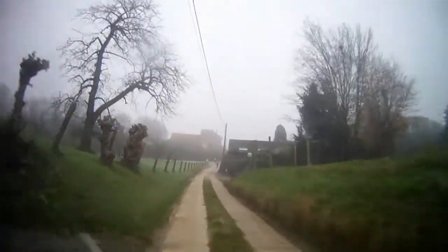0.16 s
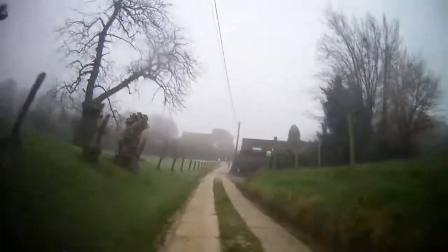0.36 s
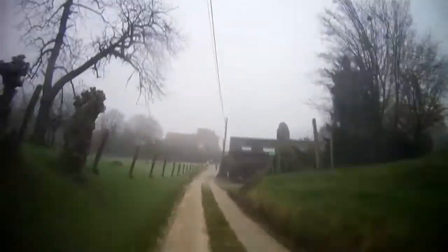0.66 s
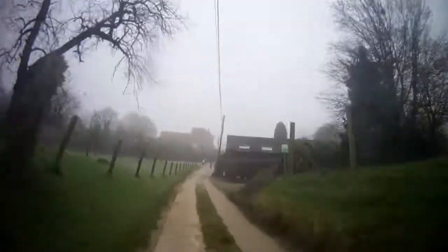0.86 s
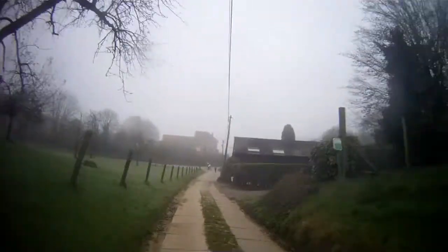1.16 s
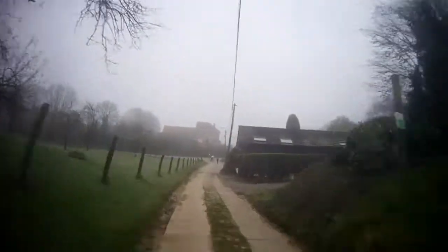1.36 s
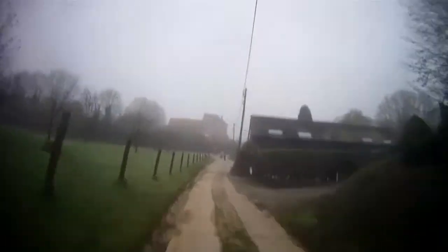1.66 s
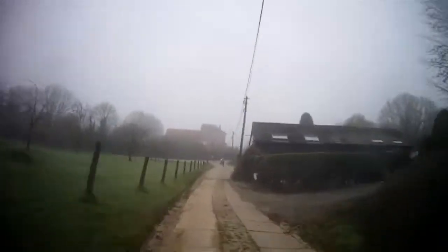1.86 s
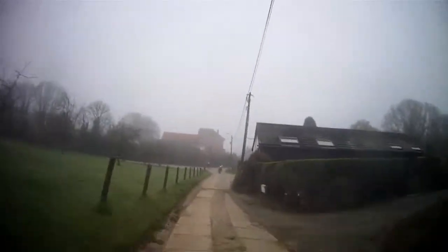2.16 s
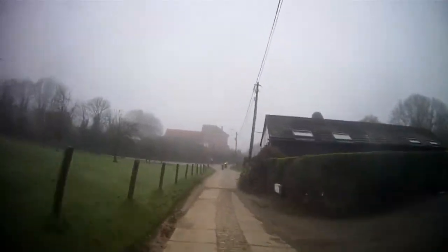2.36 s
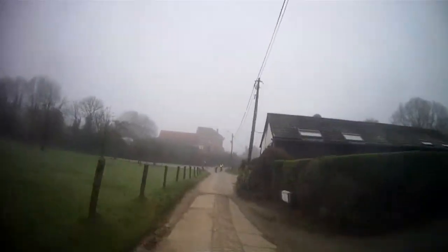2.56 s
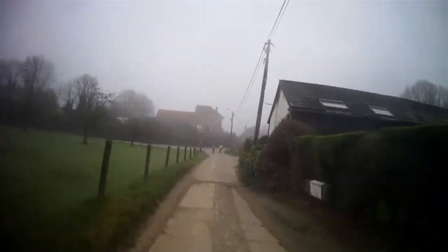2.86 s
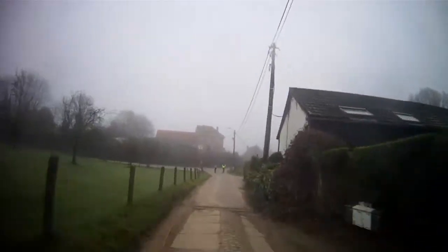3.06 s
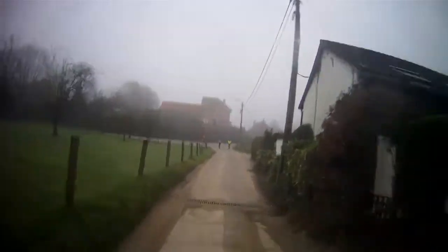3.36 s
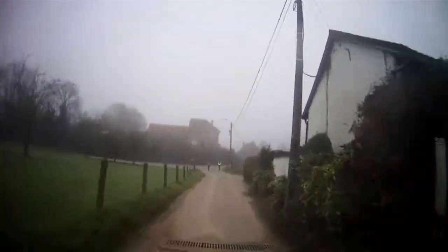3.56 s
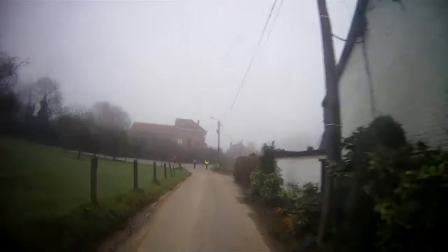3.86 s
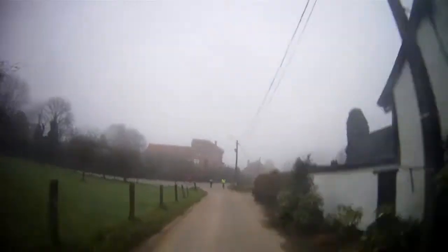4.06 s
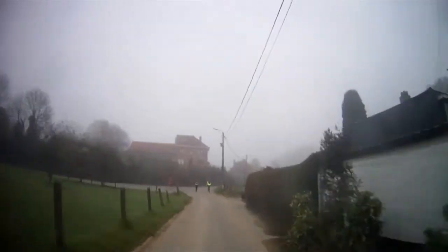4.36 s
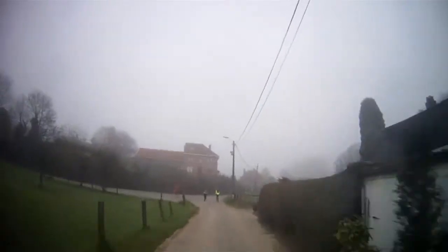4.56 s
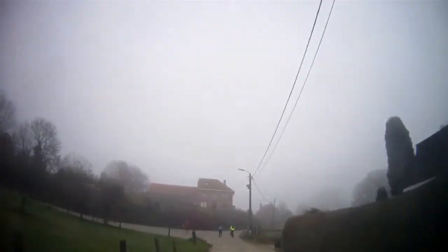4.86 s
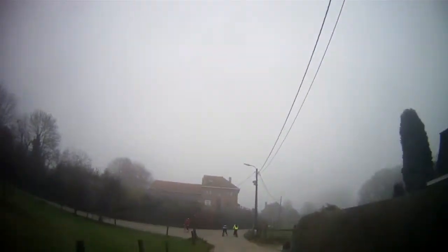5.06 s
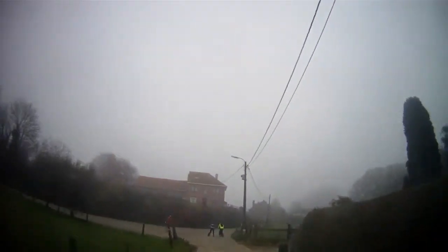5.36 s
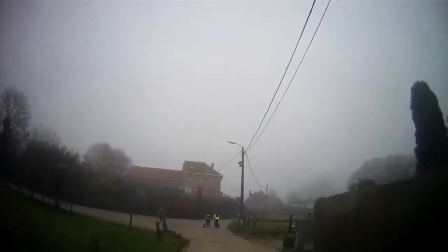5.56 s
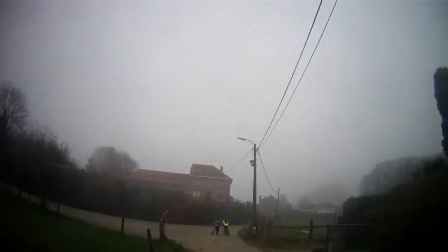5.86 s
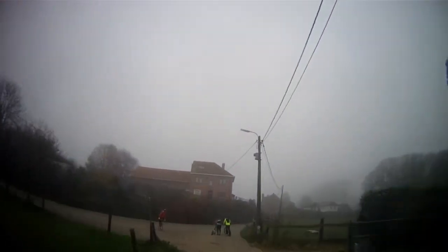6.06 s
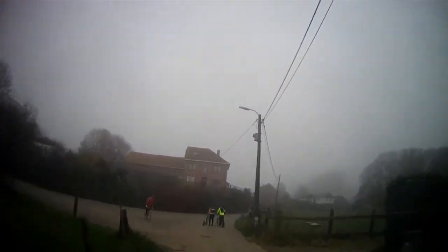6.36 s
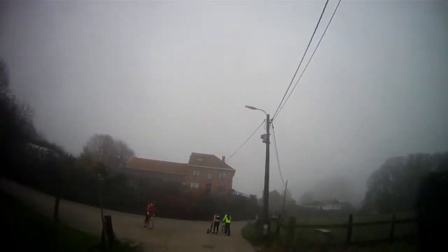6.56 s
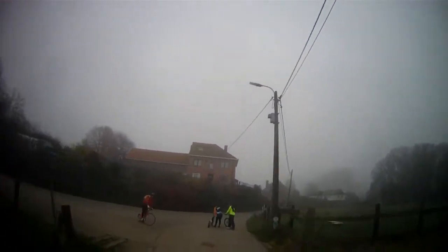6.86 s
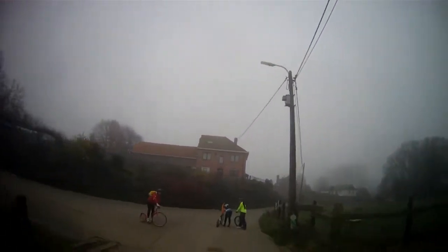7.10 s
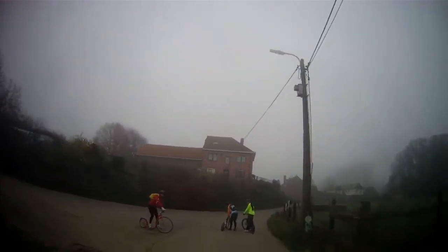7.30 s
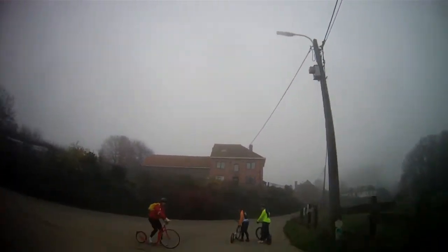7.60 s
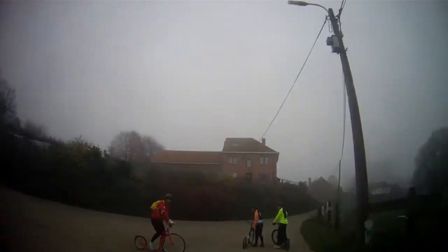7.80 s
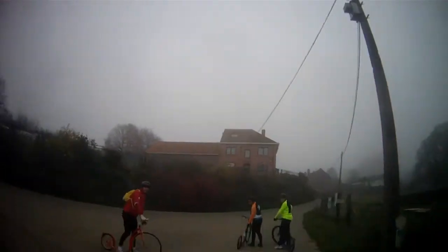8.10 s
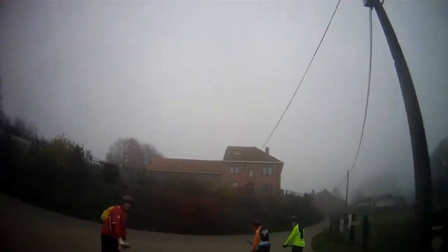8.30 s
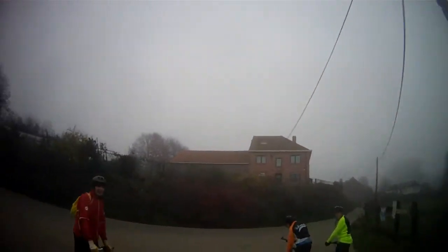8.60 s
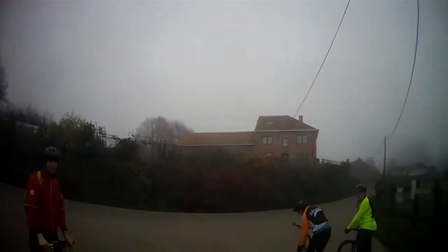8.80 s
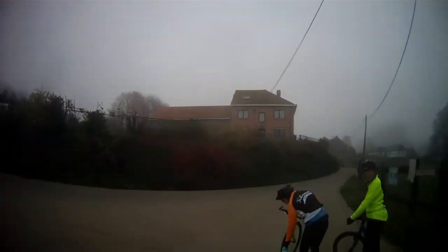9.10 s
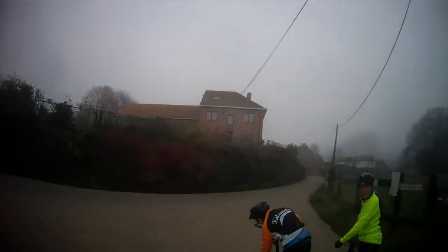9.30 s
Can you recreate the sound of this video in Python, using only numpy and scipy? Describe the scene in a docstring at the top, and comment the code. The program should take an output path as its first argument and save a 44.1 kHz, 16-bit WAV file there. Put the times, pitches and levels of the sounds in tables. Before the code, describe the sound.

A kick scooter rolls over rough concrete with a steady gritty rush, then slows through loose rattling ticks and stops into faint hiss.

```python
"""Kick scooter braking to a halt

A kick scooter rolls over concrete, then smoother asphalt, and brakes to a halt, heard by one microphone
in a closed camera case. Tyre rumble, roar and sizzle are shaped noise; road grit excites fixed resonances
of frame, stem, case and mount. Loose parts tick as short damped modes and chatter as resonant grit at low speed.
The brake pads rub as patchy resonant noise and whistle briefly as a wavering sine, over microphone hiss."""
import sys
import numpy as np
from scipy import signal
from scipy.fft import rfft, irfft, next_fast_len
from scipy.io import wavfile
from scipy.ndimage import uniform_filter1d, map_coordinates

SR = 44100
rng = np.random.default_rng(int(sys.argv[2]) if len(sys.argv) > 2 else 0)


def put_to_file(sound):
    """Save the sound as 16-bit audio at rate SR, in the file named by the first command-line argument."""
    columns = np.atleast_2d(sound).T  # one column per channel
    safe = np.clip(columns, -1, 1)
    whole_steps = np.round(safe * 32767)
    wavfile.write(sys.argv[1], SR, whole_steps.astype(np.int16))


N = 416298

# Rolling levels before jolts and wavering. Each row: time in seconds, tyre roar in dB,
# shaking of the case in dB, hum of the frame in dB, tyre sizzle in dB.
ROLL_LEVELS = [(0.0, -53, -50.5, -51, -55), (0.39, -53, -49.5, -50, -62), (0.84, -55, -53, -50.5, -59),
               (1.3, -53.5, -51, -50, -57), (1.46, -53.5, -51, -46, -53.5), (1.66, -52, -50, -46.5, -59),
               (1.84, -54.5, -49.5, -51.5, -58), (1.99, -52, -49.5, -50, -57),
               (2.09, -53.5, -50.5, -48.5, -55), (2.28, -54, -49, -50, -54), (2.71, -53, -49.5, -50.5, -63),
               (2.95, -52, -47.5, -50, -56), (3.23, -53.5, -48.5, -48.5, -57),
               (3.63, -52.5, -50, -51.5, -53.5), (3.79, -53, -49, -50.5, -55.5),
               (3.94, -52, -51.5, -53, -67), (4.07, -54, -48.5, -50, -53.5), (4.26, -54, -49.5, -50, -52),
               (4.63, -55.5, -54, -53, -57), (5.0, -54.5, -54, -52, -51), (5.28, -54.5, -53.5, -53, -53),
               (5.6, -55, -54, -54, -56), (5.78, -55.5, -57, -55.5, -54), (5.9, -53, -54, -52, -53),
               (6.1, -55.5, -57, -53, -57), (6.44, -57, -61, -58, -62), (6.6, -58.5, -62, -58.5, -61.5),
               (7.0, -63, -66.5, -63, -71.5), (7.38, -60.5, -65, -61.5, -68),
               (7.48, -63.5, -69, -64.5, -78), (7.7, -62, -65, -62, -72), (7.86, -61, -69.5, -65, -70),
               (7.95, -59, -67.5, -61.5, -69), (8.17, -64.5, -71.5, -65, -77), (8.49, -68.5, -75, -73, -88),
               (8.73, -68.5, -76, -67, -88), (8.86, -72, -75, -72, -90), (8.97, -77.5, -77, -77, -92),
               (9.1, -89, -82, -75, -91), (9.44, -99, -80, -79, -83)]
# Stretches of road. Each row: start in seconds, rumble over roar in dB, stem over case in dB,
# mount over case in dB, damped share of the case (0-1).
ROAD_STRETCHES = [(0, -13.5, -6, -6.5, 0.1), (2.25, -11, -5.5, -10.5, 0.1), (3.0, -11, -4.5, -8.5, 0.1),
                  (3.55, -12.5, -5, -18, 0.4), (4.35, -8.5, -0.5, -8, 0), (4.7, -16, -5.5, -10, 0.5),
                  (5.5, -17.5, -4.5, -15, 0.6), (6.4, -11.5, -3, -9.5, 0.4), (7.6, -14, -2.5, -7, .6),
                  (8.2, -9.5, -4, -4, 0.5)]


def rolling():
    """Shared bumps shake every layer but the rumble; frame and case ring to the same road grit."""
    roar_db, case_db, frame_db, sizzle_db = curves(ROLL_LEVELS)
    rumble_over_db, stem_over_db, mount_over_db, damped = stretches(ROAD_STRETCHES)
    jolt_low_db, jolt_high_db = jolts()
    bumps_db = 0.37 * wobble(14) + 0.5 * wobble(35)
    road = grit(rate_hz=1200, spread_db=5.5, share=0.31)
    jolted_case_db = case_db + jolt_high_db
    layers = [
        rumble(roar_db + rumble_over_db),
        roar(roar_db, bumps_db),
        sizzle(sizzle_db + jolt_high_db, bumps_db),
        frame(frame_db + jolt_low_db, bumps_db, road),
        stem(case_db + stem_over_db, bumps_db),  # no jolts
        case(jolted_case_db, bumps_db, road, damped),
        mount(jolted_case_db + mount_over_db, bumps_db),
    ]
    return sum(layers)


# Tyre roar spectrum. Each row: frequency in Hz, relative density in dB per Hz.
ROAR_SPECTRUM = [(150, -23), (300, -15.5), (500, -5), (750, -0.5), (1100, -6), (1400, -9.5), (2300, -36),
                 (3500, -20.5), (6000, -55), (8000, -60)]


def roar(level_db, bumps_db):
    """Tyre roar: noise in a broad midrange band."""
    waver_db = 0.84 * bumps_db + 0.28 * wobble(6.4)
    return amp(level_db + waver_db) * coloured(rng.standard_normal(N), ROAR_SPECTRUM)


# Low rumble spectrum. Each row: frequency in Hz, relative density in dB per Hz.
RUMBLE_SPECTRUM = [(15, -40), (30, -23), (60, -9), (120, -4), (250, -1.5), (400, -3), (600, -5.5),
                   (900, -73)]


def rumble(level_db):
    """Low rolling rumble: noise with its own slow waver."""
    return amp(level_db + 2.2 * wobble(2.73)) * coloured(rng.standard_normal(N), RUMBLE_SPECTRUM)


# Resonances of the case. Each row: centre in Hz, width in Hz before widening, relative level in dB.
CASE_MODES = [(3696, 290, -4.5), (3996, 100, 2), (4430, 202, 1), (5285, 296, -10.5), (6080, 300, -11),
              (6460, 270, -19.5), (6940, 470, -18.5), (10270, 600, -36)]
DAMPED_WIDTH_RATIO = 1.53  # smooth road over rough


def case(level_db, bumps_db, road, damped):
    """Grit rings the camera case; smooth road mixes in the same modes broadened."""
    damped = np.clip(damped, 0, 1)
    broad_modes = [(hz, DAMPED_WIDTH_RATIO * width_hz, db) for hz, width_hz, db in CASE_MODES]
    walls = (1 - damped) * resonant(road, CASE_MODES) + damped * resonant(road, broad_modes)
    return amp(level_db + 1.0 * bumps_db + 0.59 * wobble(25)) * patchy(walls, depth_db=1.07)


# Resonances of the frame. Each row: centre in Hz, width in Hz before widening, relative level in dB.
FRAME_MODES = [(1674, 214, 0.5), (1825, 338, -2.5), (2026, 224, -0.5)]


def frame(level_db, bumps_db, road):
    """Grit makes the frame hum through its resonances."""
    return amp(level_db + 0.51 * bumps_db + 1.02 * wobble(25)) * resonant(road, FRAME_MODES)


# Resonances of the stem. Each row: centre in Hz, width in Hz before widening, relative level in dB.
STEM_MODES = [(2620, 100, -6), (2840, 170, 2.5)]


def stem(level_db, bumps_db):
    """Grit of its own, with weaker stones, rings the stem."""
    pebbles = grit(rate_hz=1200, spread_db=7.0, share=0.15)
    return amp(level_db + 0.38 * bumps_db + 1.1 * wobble(28)) * resonant(pebbles, STEM_MODES)


# Resonance of the mount. Each row: centre in Hz, width in Hz before widening, relative level in dB.
MOUNT_MODES = [(4847, 130, 0)]


def mount(level_db, bumps_db):
    """Grit rings the mount in a single mode."""
    pebbles = grit(rate_hz=1400, spread_db=4.5, share=0.18)
    return amp(level_db + 1.2 * bumps_db + 2.1 * wobble(12)) * resonant(pebbles, MOUNT_MODES)


# Tyre sizzle spectrum. Each row: frequency in Hz, relative density in dB per Hz.
SIZZLE_SPECTRUM = [(500, -30), (900, 5), (1400, 9), (2000, -20), (2450, 5), (2800, -11), (3200, 3),
                   (3700, 2.5), (5000, -17), (5350, 4), (6000, -2), (6600, -7), (8800, -21), (10600, -22.5),
                   (11200, -48)]


def sizzle(level_db, bumps_db):
    """Tyre sizzle: dense grit through an uneven bright spectrum."""
    fine_grit = grit(rate_hz=2300, spread_db=7.5, share=0.41)
    return amp(level_db + 1.9 * bumps_db + 0.93 * wobble(14)) * coloured(fine_grit, SIZZLE_SPECTRUM)


# Jolts from road seams. Each row: centre in seconds, gain on the frame in dB,
# gain on case, mount and sizzle in dB, time from the centre to 1/e in seconds.
SEAM_JOLTS = [(2.072, 3, -0.5, .03), (2.204, 0.5, 1.5, 0.038), (2.923, 3.5, -1.5, 0.022),
              (3.125, 0.5, 0.5, .015), (3.425, 4, 2, 0.012), (3.51, 4.5, -0.5, .02), (3.8, 1, 3, 0.029),
              (3.882, 7, 1, 0.02), (4.05, 1, 3, .02), (4.234, 3.5, 1, .025), (4.473, 1, 1, 0.013)]


def jolts():
    """Gaussian level changes in dB at the seams: one curve for the frame, one for the brighter layers."""
    out = np.zeros((2, N))
    for centre_s, low_db, high_db, long_s in SEAM_JOLTS:
        n = np.arange(round((centre_s - 3 * long_s) * SR), round((centre_s + 3 * long_s) * SR))
        swell = np.exp(-((n / SR - centre_s) / long_s) ** 2)
        out[:, n] += np.outer([low_db, high_db], swell)
    return out


def grit(rate_hz, spread_db, share):
    """Road texture: fine noise with random sharp stones of uneven size; share is the stones' power."""
    sizes = amp(spread_db * np.clip(rng.standard_normal(N), -2, 2))
    stones = (rng.random(N) < rate_hz / SR) * sizes * rng.choice([-1, 1], size=N)
    share = np.clip(share, 0, 1)
    return np.sqrt(1 - share) * rng.standard_normal(N) + np.sqrt(share) * unit(stones)


# Ticks of loose parts. Each row: start in seconds, low ring in dB, middle ring in dB,
# high ring in dB before a 4.5 dB cut, low pitch in Hz, middle pitch in Hz, ring time over the usual.
LOOSE_TICKS = [(5.4878, -58, -39, -43, 1890, 4030, 1.3), (5.517, -66, -46, -60, 1900, 3600, 1.2),
               (6.9007, -49, -65, -62, 2100, 3880, 1.3), (6.945, -50, -47.5, -60, 1880, 3620, 0.92),
               (7.0544, -50, -61, -62, 2110, 3650, 1.2), (7.1302, -50.5, -51, -64, 1900, 3600, 1),
               (7.206, -52, -68, -66, 1990, 3780, 1.6), (7.272, -68, -63, -55, 1900, 4400, 1.1),
               (7.3483, -51, -57, -61, 1940, 3800, 1.5), (7.4026, -49, -61, -66, 2100, 3750, 1.2),
               (7.45, -46, -53, -70, 1950, 3700, 0.74), (7.5224, -50, -53, -64, 1900, 3400, .8),
               (7.5406, -55, -52, -66, 1880, 3610, 1.3), (7.6061, -62, -54, -53, 1900, 3410, 1),
               (7.6518, -46.5, -49, -53, 1930, 3500, 1.1), (7.701, -70, -51, -59, 2030, 3930, 1),
               (7.7314, -54, -54, -64, 1900, 3680, 1), (7.749, -52, -64, -68, 1950, 3790, 1.4),
               (7.794, -40, -42, -63, 1890, 3920, 1.24), (7.802, -53.5, -51, -61, 1900, 3640, .9),
               (7.815, -51, -64, -70, 1950, 3800, 1), (7.8496, -47, -52, -49, 1870, 3460, 1.2),
               (7.871, -68, -62, -56, 1900, 4300, .9), (7.893, -68, -62, -55, 1900, 4300, .9),
               (7.943, -50, -48, -55, 1720, 3380, 1), (7.955, -54, -60, -67, 1990, 3940, 1.3),
               (8, -41, -46, -62, 1980, 3900, 1.2), (8.204, -48, -47, -68, 1880, 3950, 1.2),
               (8.2264, -66, -65, -56, 1900, 4370, 1.2), (8.2328, -55, -57, -71, 1900, 3960, .9),
               (8.298, -51.5, -56, -62, 1800, 3800, 1.1), (8.35, -49, -61, -61, 1980, 3550, 1.3),
               (8.409, -52, -54, -63, 1900, 3580, 0.94), (8.49, -51, -62, -55, 1960, 4380, 0.78),
               (8.51, -70, -64, -64, 1890, 4480, 1.5), (8.513, -70, -57, -61, 1900, 4400, 2.2),
               (8.523, -50, -51, -62, 1900, 3610, 1), (8.547, -72, -63, -70, 1900, 4500, 1),
               (8.584, -52, -70, -70, 2000, 4460, 1.4), (8.6567, -52, -64, -59, 1920, 3760, 1.4),
               (9.045, -76, -64, -76, 1900, 3900, 1), (9.2222, -56.5, -64, -74, 1920, 3860, 1),
               (9.262, -64, -69, -76, 1670, 3880, 1.4), (9.358, -63, -70, -76, 1980, 4050, 1.2)]
# Low modes. Each row: multiple of the low pitch, relative level in dB, usual t60 in seconds.
LOW_MODES = [(.68, -5, .007), (.82, -3, .008), (.93, -2, .010), (1.01, 5, .016), (1.15, -4, .007)]
# Middle modes. Each row: multiple of the middle pitch, relative level in dB, usual t60 in seconds.
MIDDLE_MODES = [(.74, -2, .006), (.87, 2, .007), (.95, 4, .008), (1.02, 8, .010), (1.14, 1, .007)]
# High modes. Each row: frequency in Hz before scaling by 0.93, relative level in dB, usual t60 in seconds.
HIGH_MODES = [(4600, 2, .008), (5300, -3, .007), (5900, 0, .008), (6300, 0, .008)]
CRACK_DB = -1  # over the strongest ring level in the row, before the band-pass


def ticks():
    """Each tick is a cracking noise burst plus three groups of short modes at its own balance."""
    out, t = np.zeros(N + SR), np.arange(SR // 20) / SR
    dull = signal.butter(4, [1400, 6000], "bandpass", fs=SR, output="sos")
    for start_s, low_db, mid_db, high_db, low_hz, mid_hz, long in LOOSE_TICKS:
        low = amp(low_db) * ring(LOW_MODES, low_hz, long, t)
        middle = amp(mid_db) * ring(MIDDLE_MODES, mid_hz, long, t)
        high = amp(high_db - 4.5) * ring(HIGH_MODES, 0.93, long, t)
        crack_db = max(low_db, mid_db, high_db) + CRACK_DB - 60 * t / 0.012
        crack = signal.sosfilt(dull, amp(crack_db) * rng.standard_normal(len(t)))
        out[round(start_s * SR):][:len(t)] += low + middle + high + crack
    return out[:N]


RISE_S = 0.0005
RING_S = 0.0018  # a usual ring holds the energy of a full-level burst this long


def ring(modes, scale, long, t):
    """Decaying modes, detuned and rebalanced at each blow; group energy depends only on ring time."""
    x = np.zeros(len(t))
    for k, (hz, db, t60_s) in enumerate(modes):
        decay_db = db + rng.normal(0, 1.6) - 60 * t / (long * t60_s)
        mode_hz = hz * scale * (1 + rng.normal(0, 0.021))
        x += (-1) ** k * amp(decay_db) * np.sin(2 * np.pi * mode_hz * t)
    x *= 1 - np.exp(-(t / RISE_S) ** 2)
    return x / np.linalg.norm(x) * np.sqrt(long * RING_S * SR)


# Resonances of loose parts. Each row: centre in Hz, width in Hz before widening, relative level in dB.
LOOSE_MODES = [(1970, 120, 6), (3380, 320, -6), (3800, 170, 1.5), (6200, 770, -18.5)]


def chatter():
    """At low speed the loose parts chatter: sparse random contacts through their resonances."""
    level_db = rise_fall(peak_s=6.8, peak_db=-62, rise_db_per_s=19, fall_db_per_s=9)
    contacts = grit(rate_hz=300, spread_db=-0.5, share=0.83)
    return amp(level_db + 1.5 * wobble(20)) * resonant(contacts, LOOSE_MODES)


# Resonances of the brake pads. Each row: centre in Hz, width in Hz before widening, relative level in dB.
PAD_MODES = [(1720, 80, -10), (2570, 140, -7), (3250, 180, -5), (3800, 200, -3), (4650, 170, 4),
             (5470, 330, -9.5)]


def brake():
    """The pads rub the rim unevenly: resonant noise, loudest with the pads fully on, plus a whistle."""
    level_db = rise_fall(peak_s=8.67, peak_db=-70, rise_db_per_s=80, fall_db_per_s=5.9)
    rubbing = patchy(resonant(rng.standard_normal(N), PAD_MODES), depth_db=2.5)
    return amp(level_db + 1.5 * wobble(40)) * rubbing + squeal()


SQUEAL_FROM_S, SQUEAL_TO_S, SQUEAL_HZ, SQUEAL_PEAK_DB = 8.665, 8.9, 1690, -72  # mean pitch and level


def squeal():
    """Thin whistle of the gripping pads: a sine wavering in pitch and level."""
    t = np.arange(N) / SR
    gate = np.clip(np.minimum(t - SQUEAL_FROM_S, SQUEAL_TO_S - t) / 0.015, 0, 1)
    waver = wobble(30)
    pitch_hz = SQUEAL_HZ + 22 * np.roll(waver, SR)  # shifted 1 s, so pitch and level waver apart
    return gate * amp(SQUEAL_PEAK_DB + 3 * waver) * np.sin(2 * np.pi * np.cumsum(pitch_hz) / SR)


# Microphone hiss spectrum. Each row: frequency in Hz, relative density in dB per Hz.
HISS_SPECTRUM = [(20, 10.5), (500, 0.5), (1250, 0), (2400, -8), (6000, 5.5), (9000, 3), (12000, 1.5),
                 (15200, 0)]
HISS_DB = -77  # mean


def hiss():
    """Microphone hiss: shaped noise with a slightly unsteady level."""
    return amp(HISS_DB + 1.5 * wobble(19)) * coloured(rng.standard_normal(N), HISS_SPECTRUM)


def amp(db):
    """Decibels to gain."""
    return 10 ** (np.asarray(db) / 20)


def unit(x):
    """x at rms 1."""
    return x / np.sqrt(np.mean(x ** 2) + 1e-20)


def curves(rows):
    """Each column after the time, interpolated linearly to every sample."""
    s, *cols = np.transpose(rows)
    return [np.interp(np.arange(N) / SR, s, c) for c in cols]


def stretches(rows):
    """Each column holds its value until the next row, with a 0.11 s blend."""
    s, *cols = np.transpose(rows)
    row = np.maximum(np.searchsorted(s, np.arange(N) / SR) - 1, 0)
    return [uniform_filter1d(c[row], size=round(0.11 * SR)) for c in cols]


def rise_fall(peak_s, peak_db, rise_db_per_s, fall_db_per_s):
    """A level in dB that climbs to its peak and then sinks."""
    t = np.arange(N) / SR - peak_s
    return peak_db + np.minimum(rise_db_per_s * t, -fall_db_per_s * t)


def wobble(knots_per_s):
    """A smooth random curve through normal random knots."""
    knots = rng.standard_normal(int(N * knots_per_s / SR) + 4)
    return map_coordinates(knots, [np.arange(N) * knots_per_s / SR])


def filtered(x, response):
    """x times a response given as a function of Hz, zero-padded against wrap-around."""
    m = next_fast_len(N + SR // 2)
    return irfft(rfft(x, m) * response(np.fft.rfftfreq(m, 1 / SR)), m)[..., :N]


def coloured(x, spectrum):
    """x through (Hz, dB) points read on a log frequency axis, rms 1."""
    f, db = np.transpose(spectrum)

    def response(hz):
        return amp(np.interp(np.log(hz + 1), np.log(f + 1), db, right=-120))

    return unit(filtered(x, response))


def resonant(x, modes):
    """x through resonances, each applied twice so the valleys stay dark, rms 1."""
    def response(f):
        total = 0
        for k, (centre_hz, width_hz, db) in enumerate(modes):
            w = 1.95 * width_hz  # widened, as squaring narrows the peak
            peak = 1j * f * w / (centre_hz ** 2 - f * f + 1j * f * w)
            total = total + (-1) ** k * amp(db) * peak ** 2
        return total

    return unit(filtered(x, response))


def patchy(x, depth_db):
    """x with slow random patches of gain in time and frequency, so resonances swell and fade, rms 1."""
    z = signal.stft(x, nperseg=512)[2]
    field = uniform_filter1d(rng.standard_normal(z.shape), size=4, axis=0)  # bins
    field = uniform_filter1d(field, size=40, axis=1)  # frames
    return unit(signal.istft(z * amp(depth_db * unit(field)), nperseg=512)[1][:N])


def scene():
    """All sources at one microphone, the same on both channels."""
    return np.tile(rolling() + ticks() + chatter() + brake(), (2, 1))


def record(dry):
    """Add microphone hiss, then cut everything from 15050 Hz up."""
    return filtered(dry + hiss(), lambda hz: hz < 15050)


dry = scene()
out = record(dry)
put_to_file(out)
```